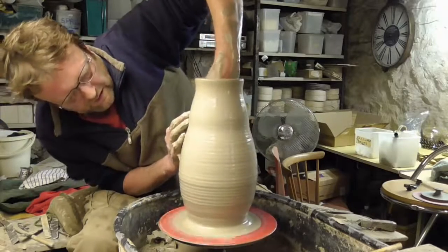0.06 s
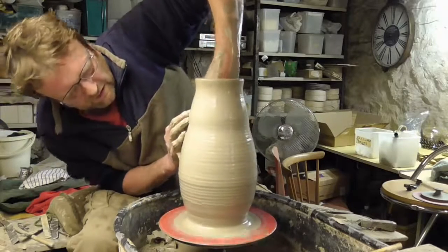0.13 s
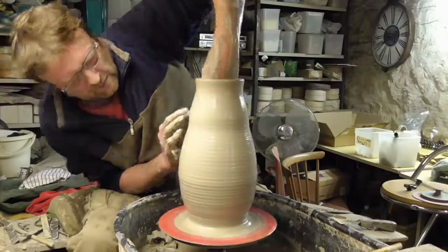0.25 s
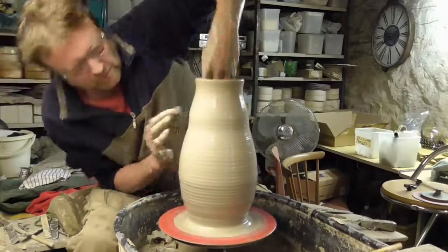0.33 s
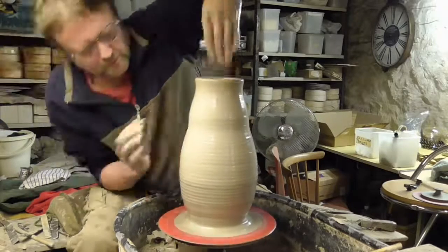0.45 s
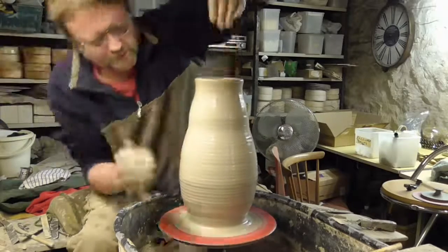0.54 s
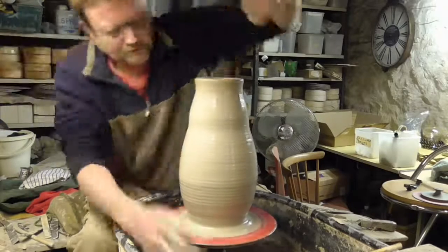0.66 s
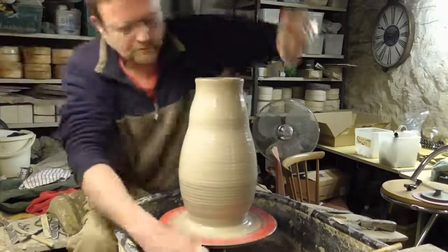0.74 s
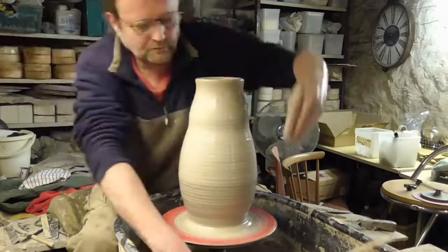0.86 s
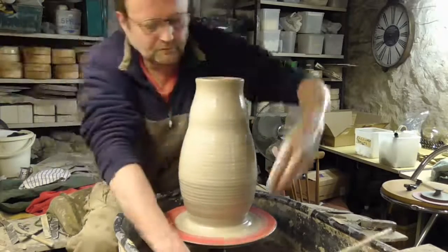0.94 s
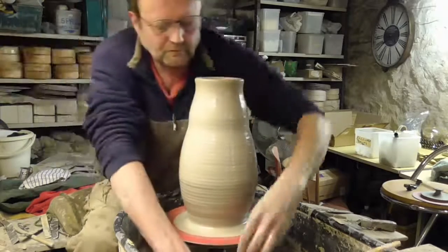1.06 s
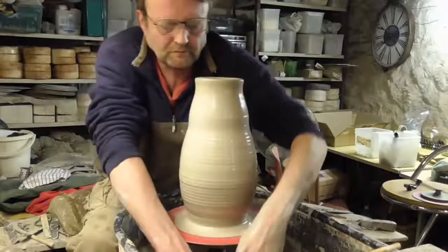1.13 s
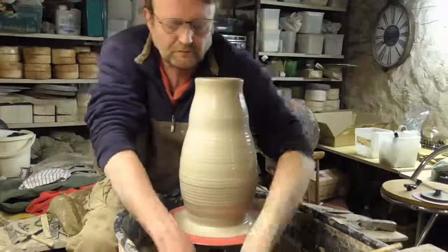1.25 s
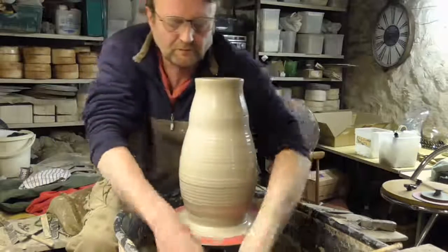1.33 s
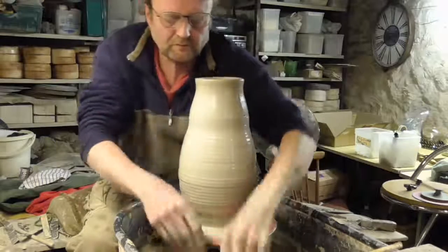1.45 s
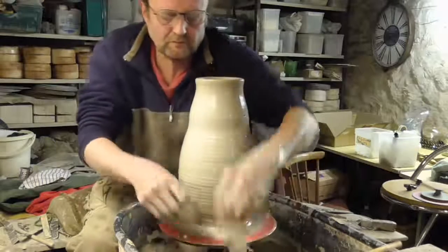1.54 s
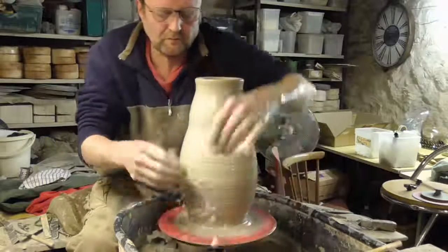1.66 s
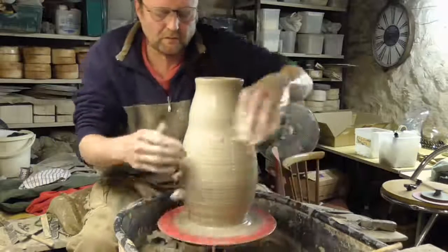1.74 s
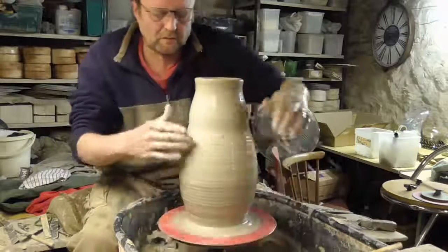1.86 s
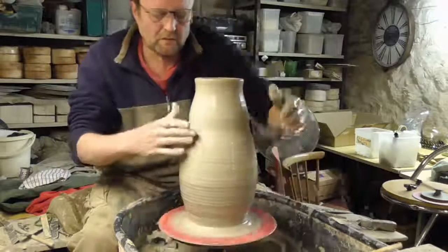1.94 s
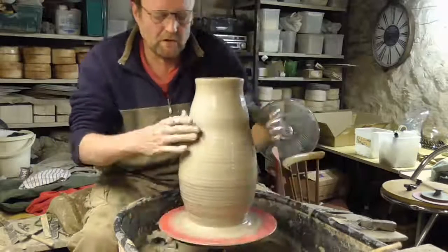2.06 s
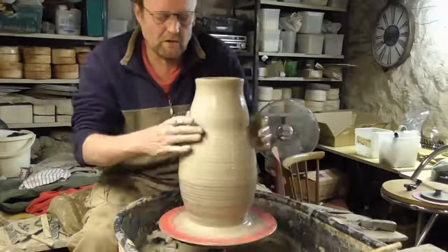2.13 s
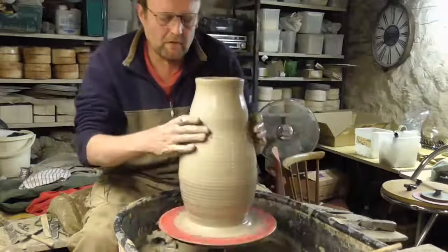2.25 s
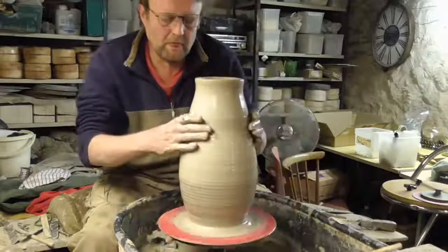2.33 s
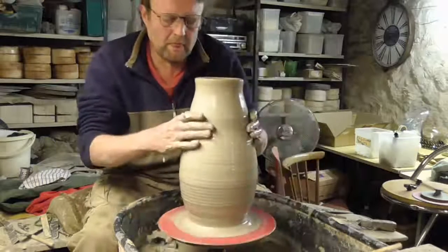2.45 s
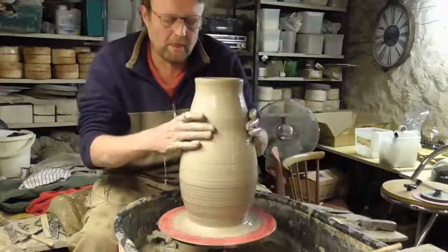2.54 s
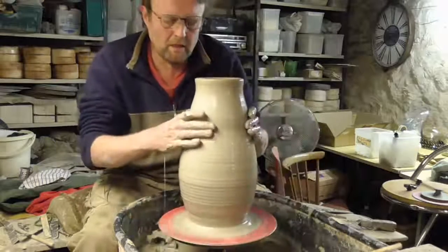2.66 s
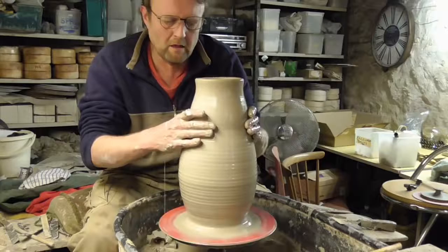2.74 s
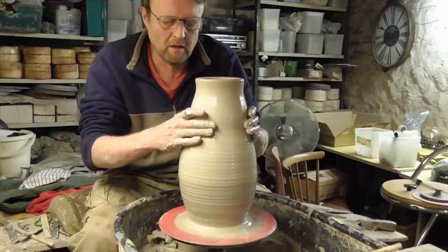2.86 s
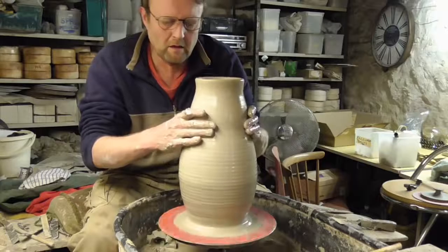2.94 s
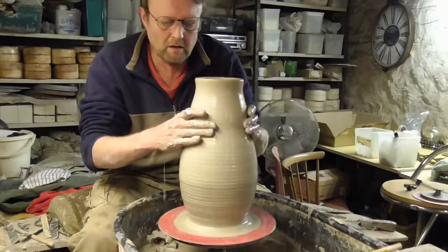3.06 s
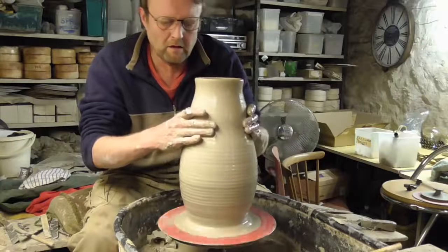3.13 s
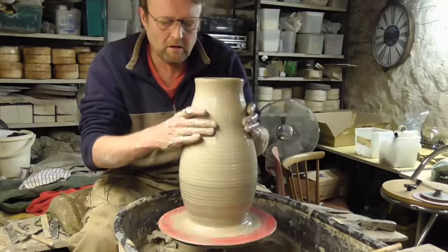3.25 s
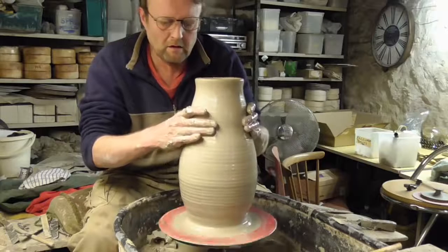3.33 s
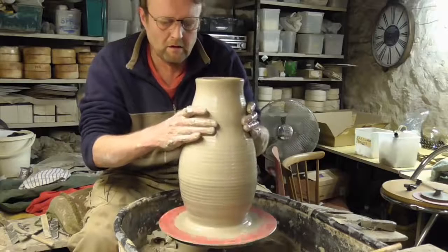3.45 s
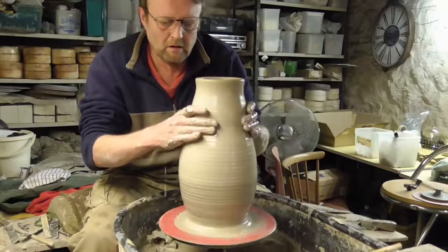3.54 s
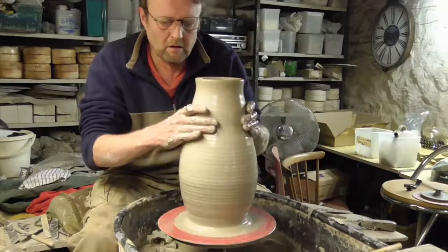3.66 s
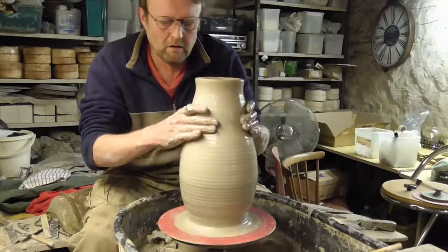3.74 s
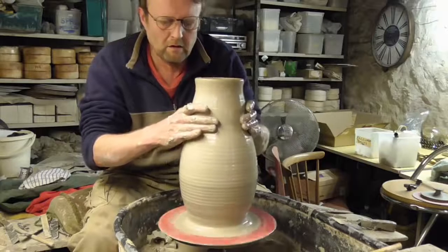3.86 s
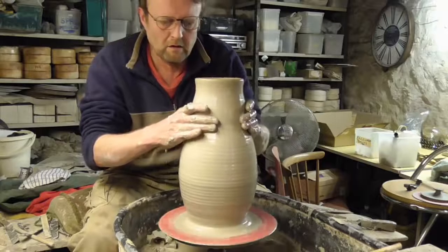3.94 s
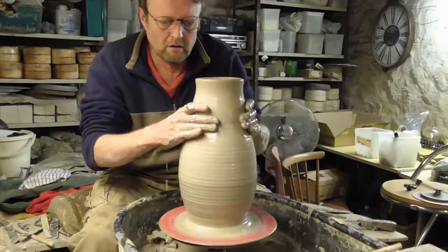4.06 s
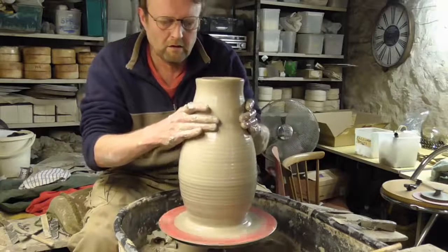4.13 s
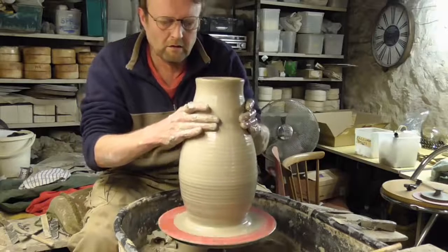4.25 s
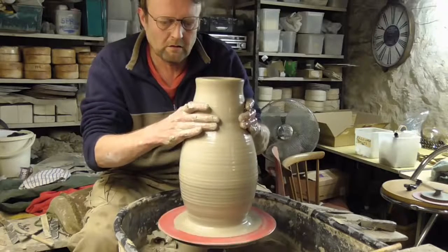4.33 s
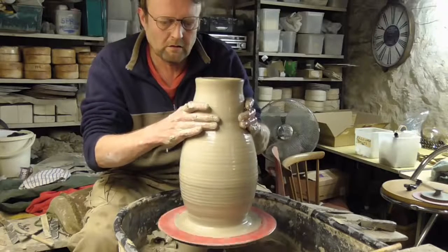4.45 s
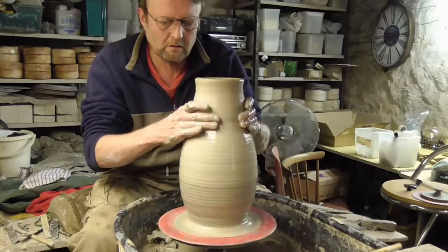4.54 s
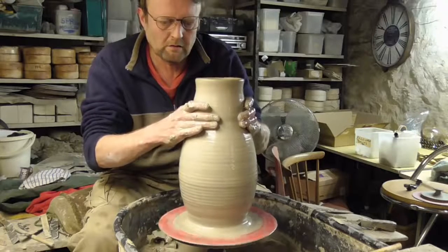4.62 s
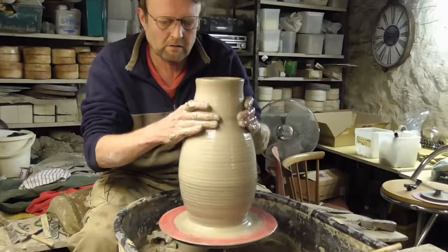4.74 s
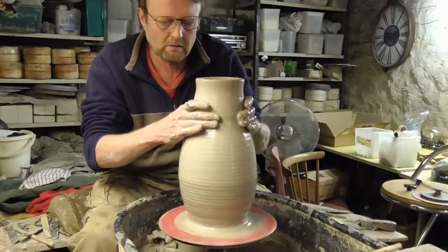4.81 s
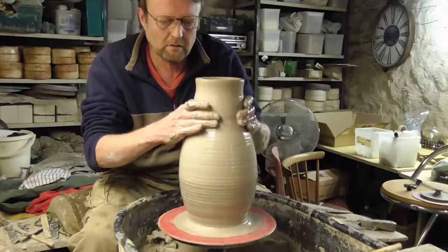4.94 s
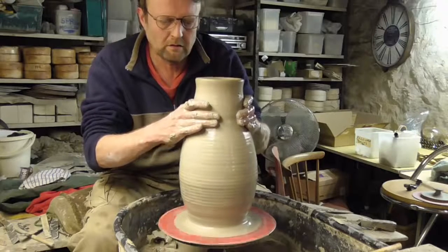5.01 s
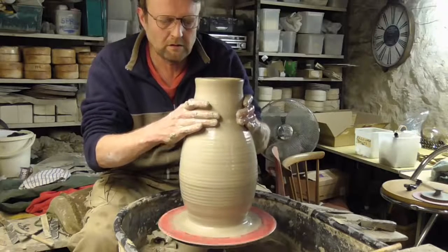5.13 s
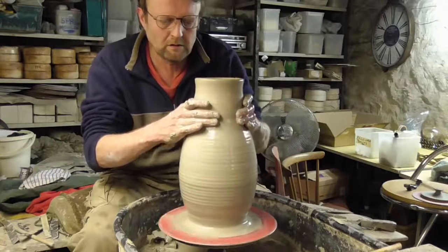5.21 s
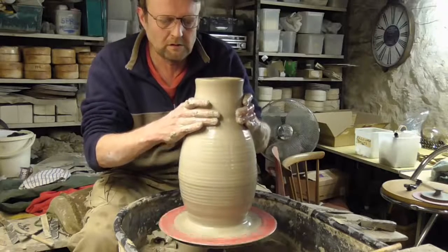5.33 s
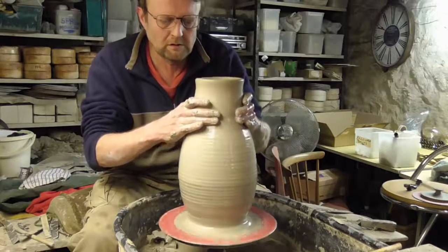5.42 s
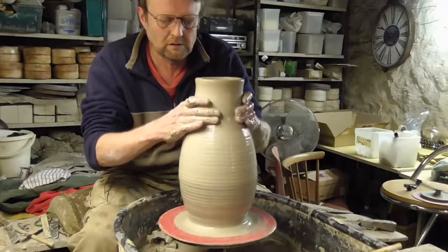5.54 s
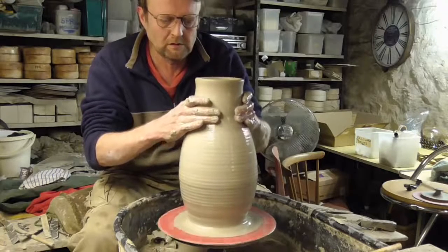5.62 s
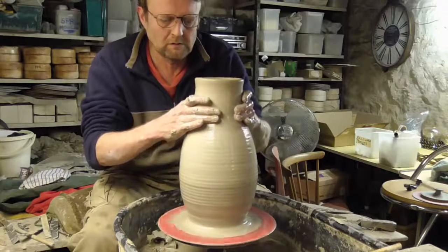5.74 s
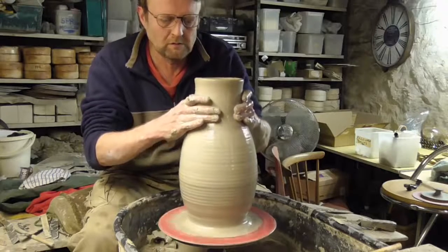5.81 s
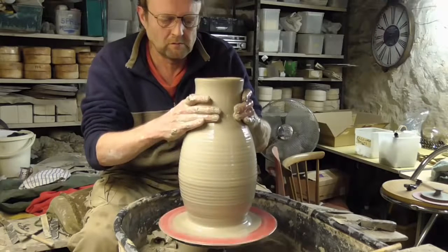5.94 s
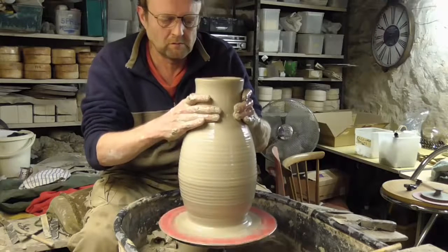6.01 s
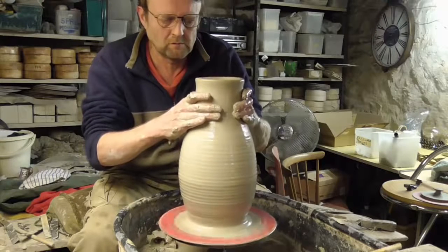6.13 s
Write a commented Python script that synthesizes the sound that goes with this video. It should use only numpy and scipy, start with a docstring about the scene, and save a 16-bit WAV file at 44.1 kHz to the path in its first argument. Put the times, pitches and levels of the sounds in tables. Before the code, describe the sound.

An electric potter's wheel hums and throbs while hands splash and drip in water, then slide faintly over wet spinning clay.

```python
"""In a small workshop an electric potter's wheel hums, throbbing with each turn of its drive,
while its frame rumbles and its bearing grumbles. The potter dips both hands in the splash pan:
palms slap, water sloshes, trapped air rings as bubbles and drops land with a ping.
Then wet palms hiss on the spinning clay and settle into a faint slither with tiny sticky ticks."""
import sys
import numpy as np
from scipy import signal
from scipy.fft import rfft, irfft, next_fast_len
from scipy.io import wavfile
from scipy.ndimage import uniform_filter1d, map_coordinates

SR = 44100
rng = np.random.default_rng(int(sys.argv[2]) if len(sys.argv) > 2 else 0)


def materialize(psi):
    """Save the field psi as 16-bit PCM at rate SR to the path in sys.argv[1].

    A 1-D psi becomes a single channel; in a 2-D psi each row is a channel.
    """
    bounded = np.clip(np.atleast_2d(psi).T, -1, 1)
    quanta = np.round(bounded * 32767).astype(np.int16)
    wavfile.write(sys.argv[1], SR, quanta)


N = 272538

MAINS_HZ, SHAFT_HZ = 50.015, 4.68  # the electric supply; turns a second of the drive shaft
# the bright tone of fine spray, shared by drops and sticky ticks: f/Hz, level/dB
SPRAY_SPECTRUM = [(1800, -17.5), (3200, -15), (4500, -17.5), (5700, -18.5), (7400, -10), (8600, -12.5),
                  (9700, -9), (12000, -8), (13500, -13), (15800, -30)]


def amp(db):
    """Turn decibels into a gain. A "t60" below is the time a sound takes to fade by 60 dB."""
    return 10 ** (np.asarray(db) / 20)


def unit(x):
    """Scale x to an average (rms) strength of 1."""
    return x / np.sqrt(np.mean(x ** 2) + 1e-20)


def clock():
    """The time of every sample in seconds."""
    return np.arange(N) / SR


def along(points, hz):
    """Read between (frequency, value) points, spaced by octaves."""
    f, v = np.transpose(points)
    return np.interp(np.log(hz + 1), np.log(f + 1), v)


def wobble(rate):
    """A smooth curve through `rate` random values a second."""
    return map_coordinates(rng.standard_normal(int(N * rate / SR) + 4), [clock() * rate])


def held(start, end, rise_s, fall_s):
    """Gain of a movement: it rises 60 dB in rise_s, holds from start to end, falls 60 dB in fall_s."""
    t = clock()
    return amp(-60 * (np.maximum(start - t, 0) / rise_s + np.maximum(t - end, 0) / fall_s))


def add(track, s, sound):
    """Mix a sound into a track at s seconds."""
    part = track[max(round(s * SR), 0):][:len(sound)]
    part += sound[:len(part)]


def filtered(x, response):
    """Turn each frequency in x up or down by the gain response(hz)."""
    size = next_fast_len(N + SR // 2)
    return irfft(rfft(x, size) * response(np.fft.rfftfreq(size, 1 / SR)), size)[..., :N]


def spread(pair, colour):
    """Blend two unrelated signals into stereo of strength 1, its tone shaped by colour(hz)."""
    # how alike left and right are: f/Hz, likeness (1 = the same)
    likeness = [(30, 0.18), (100, 0.3), (250, 1), (500, 0.8), (2000, 0.66), (4000, 0.78), (8000, 0.31),
                (12000, 0.3)]

    def shares(hz):
        angle = np.arccos(np.clip(along(likeness, hz), -1, 1)) / 2
        return colour(hz) * np.array([np.cos(angle), np.sin(angle)])
    mid, side = filtered(pair, shares)
    return unit(np.array([mid + side, mid - side]))


def rush(spectrum):
    """Stereo noise of strength 1 with the given spectrum."""
    return spread(rng.standard_normal((2, N)), lambda hz: amp(along(spectrum, hz)))


def narrow(hz, width_hz):
    """Stereo noise of strength 1, gathered around one pitch."""
    return spread(rng.standard_normal((2, N)), lambda f: 1 / (1 + ((f - hz) / width_hz) ** 2))


def froth(spectrum, rate, low_hz, high_hz, cycles, scatter_db, wash_db):
    """Tiny ringing bubbles, `rate` a second, on a wash of noise; stereo, strength 1."""
    when, pitch, strength = rng.random((int(rate * N / SR), 3)).T[:, :, None]
    age = np.arange(500)  # samples
    turns = low_hz * (high_hz / low_hz) ** pitch * age / SR
    gain = amp(-scatter_db * np.log(strength + 0.079))
    rings = gain * np.sin(2 * np.pi * turns) * np.exp(-turns / cycles) * (1 - age / len(age))
    places = (when * N).astype(int) + age
    cloud = np.bincount(places.ravel(), rings.ravel(), N)[:N]
    cloud = unit(cloud) + amp(wash_db + 5.3 * wobble(180)) * rng.standard_normal(N)
    # left and right get the same bursts with different fine detail
    bursts = np.sqrt(np.abs(uniform_filter1d(cloud ** 2, size=200)))
    pair = np.array([cloud, bursts * rng.standard_normal(N)])
    return spread(pair, lambda hz: amp(along(spectrum, hz)))


def workshop_echo(x, width=0.47):
    """Crowded shelves scatter a sound into a short echo, much alike left and right."""
    # how long the room rings: f/Hz, t60/s
    ring_times = [(200, 0.086), (2000, 0.24), (12000, 0.057)]
    hz, t, noise = signal.stft(rng.standard_normal((2, SR // 2)), SR, nperseg=256)
    fade = amp(-60 * t / along(ring_times, hz)[:, None])
    mid, side = signal.istft(noise * fade, SR, nperseg=256)[1]
    tail = np.array([mid + width * side, mid - width * side]) / np.linalg.norm(mid)
    delayed = np.pad(x, (130, 0))
    return signal.fftconvolve(delayed[None], tail, axes=1)[:, :N]


def bearing(swell_db=0.5, swell_s=0.11, scuff_t60=0.18):
    """The bearing grinds harder twice a turn and rings the housing; the drive scuffs, whines, hisses."""
    # pitches at which the housing rings: f/Hz, width/Hz, level/dB
    resonances = [(428, 44, 1), (493.6, 19.7, 3.5), (521, 12, 4), (615.8, 15, 4), (679, 37, -4),
                  (818, 57, -5.5), (932, 37, -9.5), (1050, 26, -10.5), (1187, 55, -8), (1350, 21, -10.5),
                  (1448, 30, -14.5), (2125, 26, -20.5)]
    # scuffs of the drive: t/s, scrape level/dB, housing bump level/dB
    scuff_events = [(.283, -42.5, -48), (.612, -44, -58), (2.0, -46, -49), (2.226, -40.5, -33.5),
                    (2.645, -48, -39), (3.108, -43, -52), (3.276, -44.5, -52), (3.41, -45.5, -54),
                    (3.717, -48, -52), (4.085, -43.5, -49), (4.598, -37, -38), (5.045, -45, -45),
                    (5.357, -46.5, -50), (5.506, -42, -42)]
    # steady hiss of the running machine: f/Hz, level/dB
    hiss_spectrum = [(300, 7), (1500, -43), (2500, -2), (3300, 3.5), (4400, 4.5), (5800, -1.5),
                     (7600, -1.5), (8800, -3), (11500, -1.5), (13500, -5), (15800, -27)]

    def housing(f):
        power = sum(amp(db) ** 2 / (1 + ((f * f - hz * hz) / (width * f + 1)) ** 2)
                    for hz, width, db in resonances)
        return np.sqrt(power / (1 + (f / 2600) ** 6))  # duller above 2600 Hz
    swell = swell_db * np.cos(4 * np.pi * SHAFT_HZ * (clock() - swell_s))
    grind = amp(-47 + swell + 0.87 * wobble(25.19)) * spread(rng.standard_normal((2, N)), housing)
    scrape, bump, t = np.zeros(N), np.zeros(N), np.arange(SR // 4) / SR
    touch = amp(-60 * t / scuff_t60) * (1 - np.exp(-t / 0.0093))
    for s, scrape_db, bump_db in scuff_events:
        add(scrape, s, amp(scrape_db) * touch)
        add(bump, s, amp(bump_db) * touch)
    whine = amp(-75 + 1.3 * wobble(13)) * narrow(hz=3050, width_hz=46)
    scuffs = scrape * narrow(hz=1267, width_hz=200) + bump * narrow(hz=600, width_hz=110)
    return grind + scuffs + whine + amp(-64.5) * rush(hiss_spectrum)


def shudder(rate_hz, peak_s, depth_db):
    """A swell in dB that comes round with every turn."""
    return depth_db * np.cos(2 * np.pi * rate_hz * (clock() - peak_s))


def frame_rumble(level_db=-34, turn_s=0.6385, repeat_share=0.62):
    """The frame shudders with the drive; most of its rumble repeats with each turn of the wheel."""
    # tone of the rumble: f/Hz, level/dB
    spectrum = [(25, -21.5), (58, -23), (82, 3), (105, -2.5), (122, -4.5), (138, 4.5), (158, -2),
                (183, 9.5), (205, 4), (265, -5.5), (304, 9.5), (335, -6), (385, -10), (600, -51.5)]
    # its slow rise and fall: t/s, level change/dB
    slow_swell = [(0, -.5), (1.5, 0), (2.5, 0.7), (3.2, 0.5), (3.9, -0.7), (4.5, -1.2), (5.15, 1.5),
                  (5.7, -0.5)]
    shaft_db = shudder(SHAFT_HZ, peak_s=0.054, depth_db=1.0)
    slow_part_db = shudder(rate_hz=2.97, peak_s=0.32, depth_db=0.71)  # a slower part of the drive
    drift_db = np.interp(clock(), *np.transpose(slow_swell)) + wobble(18)
    one_turn = irfft(np.exp(2j * np.pi * rng.random((2, round(turn_s * SR / 2)))))  # plain noise
    looped = one_turn[:, np.arange(N) % one_turn.shape[1]]
    repeating = spread(looped, lambda hz: amp(along(spectrum, hz)))
    rumble = np.sqrt(repeat_share) * repeating + np.sqrt(1 - repeat_share) * rush(spectrum)
    return amp(level_db + shaft_db + slow_part_db + drift_db) * rumble


def motor_hum(sway_rad=0.25, wander_rad=0.57):
    """The motor's magnetic hum sags and sways once a turn, where the drive binds."""
    # tones of the hum: multiple of the mains, level/dB, t/s of a deepest sag
    hum_tones = [(2, -28, 0.171), (4, -32.5, 0.1554), (6, -46, .11)]
    # side tones that make them throb: multiple of the mains, offset in shaft rates, level/dB
    side_tones = [(2, -1, -47), (2, 2, -48.5), (2, 3, -52), (4, -1, -40), (4, -2, -48), (4, -4, -47),
                  (4, -5, -52), (6, -1, -51), (6, -2, -52), (6, 2, -53), (6, 3, -53)]
    mains_phase = 2 * np.pi * MAINS_HZ * clock()
    hum = np.zeros(N)
    for multiple, db, bind_s in hum_tones:
        phase = multiple * mains_phase
        shaft = 2 * np.pi * SHAFT_HZ * (clock() - bind_s)
        throb = sum(amp(side_db) * np.sin(phase + offset * shaft + wander_rad * wobble(3.026))
                    for parent, offset, side_db in side_tones if parent == multiple)
        tone = amp(db + 0.27 * multiple * wobble(4)) * np.sin(phase + sway_rad * np.cos(shaft))
        hum += throb - tone
    return np.sqrt(2) * hum


def sticking_fingers(from_s=2.3, per_second=9, faint_db=-57, scatter_db=3.5, tick_t60=0.014):
    """Wet fingers catch on the turning clay and let go with tiny dry ticks."""
    # the few clearer ticks: t/s, level/dB
    clear_ticks = [(2.997, -52), (3.212, -50), (3.392, -46), (5.097, -46.5), (5.153, -42.5)]
    out, t = np.zeros(N), np.arange(SR // 30) / SR
    span = N / SR - from_s
    faint_ticks = [(from_s + span * when, faint_db + scatter_db * (2 * size - 1))
                   for when, size in rng.random((int(per_second * span), 2))]
    for s, db in clear_ticks + faint_ticks:
        add(out, s, amp(db - 60 * t / tick_t60))
    return out * rush(SPRAY_SPECTRUM)


def palms_on_clay(slither_db=-82, grit_db=-7, rise_s=0.32):
    """Wet skin hisses and crackles on the pot until the film of runny clay evens out; fingers squeak."""
    # strokes of skin on clay: start/s, end/s, level/dB, t60/s
    strokes = [(0.558, 0.628, -54.5, 0.2), (0.82, 0.845, -57.5, 0.1), (2.07, 2.31, -51.5, 2)]
    # thin fingertip squeaks: t/s, level/dB, f/Hz, half length/s, width/Hz
    squeak_events = [(2.55, -63, 11400, 0.31, 700), (4.103, -61, 11400, .03, 1600),
                     (4.665, -60, 7600, .025, 700)]
    # tone of sliding on wet clay: f/Hz, level/dB
    spectrum = [(1200, 6), (2500, -4), (3500, -7), (4650, -2.5), (5400, -5), (5750, 0), (6300, -3.5),
                (7500, 2.5), (8400, -3.5), (9400, 1), (9750, -3), (10300, 2), (11600, 1.5), (12800, -2),
                (15500, -17)]
    slide = amp(slither_db) + sum(amp(db) * held(start, end, rise_s, fall_s)
                                  for start, end, db, fall_s in strokes)
    squeaks = sum(amp(db) * np.exp(-((clock() - s) / half) ** 2) * narrow(hz, width)
                  for s, db, hz, half, width in squeak_events)
    grit = froth(spectrum, rate=500, low_hz=3980, high_hz=12700, cycles=12, scatter_db=3.5, wash_db=-8)
    flicker = amp(0.88 * wobble(60))
    hiss = unit(rush(spectrum) + amp(grit_db) * grit)
    return slide * flicker * hiss + squeaks


def sloshing(rise_s=0.91, fall_s=0.99):
    """Hands stir the pan and throw up splashes: larger bubbles gurgle, fine spray fizzes."""
    # hands moving through the water: start/s, end/s, level/dB
    stirs = [(1.04, 1.4, -50.5), (1.47, 1.62, -49.5), (1.97, 2.02, -52.5)]
    # water running off the hands: start/s, end/s, level/dB
    runoff = [(1.04, 1.36, -58), (1.47, 1.77, -49.5)]
    # splashes as the hands plunge and lift: t/s, slosh level/dB, spray level/dB, t60/s
    splashes = [(0.9, -48.5, -60, 0.55), (0.976, -36, -39, 0.13), (1.093, -47, -39, 0.12),
                (1.25, -51.5, -39, 0.15), (1.294, -47, -42, 0.12), (1.372, -51, -53, 0.18),
                (1.397, -54.5, -29.5, 0.098), (1.455, -48, -58.5, 0.15), (1.519, -50, -52, 0.067),
                (1.698, -70, -54, 0.18), (1.831, -76, -40.5, 0.13), (1.905, -54, -60, 0.49),
                (1.958, -50, -46.5, 0.1)]
    # tone of the gurgling water: f/Hz, level/dB
    slosh_spectrum = [(250, -19), (500, 1), (800, 3), (1250, 4.5), (2400, -8.5), (3600, -3.5), (5000, -5),
                      (7000, -41)]

    def flow(moves):
        return np.max([amp(db) * held(start, end, rise_s, fall_s) for start, end, db in moves], axis=0)
    slosh, spray, t = flow(stirs), flow(runoff), np.arange(SR // 4) / SR
    for s, slosh_db, spray_db, t60 in splashes:
        surge = (1 - np.exp(-t / 0.0062)) * amp(-60 * t / t60)
        add(slosh, s, amp(slosh_db) * surge)
        add(spray, s, amp(spray_db) * surge)
    gurgle = froth(slosh_spectrum, rate=600, low_hz=602, high_hz=5420,
                   cycles=20, scatter_db=1.5, wash_db=-1.5)
    fizz = froth(SPRAY_SPECTRUM, rate=1400, low_hz=4020, high_hz=14550,
                 cycles=27, scatter_db=3.5, wash_db=-4.5)
    return slosh * gurgle + spray * fizz


def slaps(slap_t60=0.032):
    """A flat hand meets the wet: a burst around one pitch, broad for a slap, narrow for a squelch."""
    # palms hitting water and clay: t/s, level/dB, f/Hz, width/octaves
    hits = [(.725, -51.5, 3500, 1.4), (.952, -34, 483, 0.65), (0.961, -39, 1200, 1),
            (.978, -38.5, 494, 0.53), (.983, -37, 2010, 0.49), (.983, -37, 3480, .7),
            (1.27, -37.5, 3430, 1.2), (1.306, -38, 1010, 1.2), (1.374, -28.5, 760, 1.3),
            (1.398, -35, 750, 0.93), (1.391, -41, 3500, 0.64), (1.408, -42, 3080, .5),
            (1.455, -40, 4050, .3), (1.477, -38.5, 3530, 0.58), (1.521, -34, 1450, 1.3),
            (1.735, -42, 3560, 0.61), (1.904, -45, 2900, 0.54), (1.915, -37.5, 2920, .8),
            (1.96, -34.5, 3820, .9), (2.196, -42.5, 4410, 0.25)]
    out, t = np.zeros(N), np.arange(SR // 8) / SR
    for s, db, hz, octaves in hits:
        edges_hz = hz * 2 ** (octaves * np.array([-0.5, 0.5]))
        band = signal.butter(2, edges_hz, "band", fs=SR, output="sos")
        splatter = unit(signal.sosfilt(band, rng.standard_normal(len(t))))
        # the air caught under the palm gives one short push
        push = np.sin(2 * np.pi * hz * t) * np.exp(-hz * octaves * t / 2)
        add(out, s, amp(db) * (amp(-60 * t / slap_t60) * splatter + 1.3 * push))
    return out


def drops(ping_t60=0.0062, smack_t60=0.017):
    """A drop lands with a wet smack and the rising ping of a tiny bubble."""
    # drops landing: t/s, level/dB, f/Hz
    landings = [(.517, -41, 11100), (.636, -38, 8800), (0.884, -35, 11500), (0.9302, -27.5, 6970),
                (0.9628, -29, 10800), (0.9843, -25, 10940), (1.042, -35, 8370), (1.105, -28, 6850),
                (1.127, -33, 11600), (1.237, -29, 4940), (1.253, -28, 8400), (1.2714, -34, 3130),
                (1.302, -24.5, 8100), (1.4005, -18.5, 7500), (1.416, -23, 11070), (1.486, -28, 6800),
                (1.576, -26.5, 10900), (1.631, -19, 8060), (1.6641, -13, 9760), (1.699, -27, 12700),
                (1.715, -20.5, 11600), (1.832, -31, 11420), (1.853, -34, 8300), (1.869, -40, 7200),
                (1.925, -24, 7570), (1.9606, -22, 7240), (2.197, -17.5, 11400)]
    pings, smacks, t = np.zeros(N), np.zeros(N), np.arange(SR // 10) / SR
    onset = 1 - np.exp(-t / 0.00025)
    for s, db, hz in landings:
        strike = amp(db - 0.5) * onset
        add(pings, s, strike * amp(-60 * t / ping_t60) * np.sin(2 * np.pi * hz * t * (1 + 5 * t)))
        add(smacks, s, strike * amp(-60 * t / smack_t60) * rng.standard_normal(len(t)))
    return pings + filtered(smacks, lambda hz: amp(along(SPRAY_SPECTRUM, hz)))


def bubbles():
    """Each air pocket rings and rises in pitch as it nears the surface."""
    # air trapped under the hands: t/s, level/dB, f/Hz, t60/s, pitch rise over t60 (0.1 = a tenth)
    pockets = [(0.961, -23, 1050, 0.041, .03), (0.975, -18.5, 793, 0.083, .02),
               (0.993, -20, 795, 0.077, .02), (.99, -35, 3100, .04, .05), (.998, -31, 3720, .025, .03),
               (1.019, -33, 804, 0.1, .02), (1.014, -35, 4170, .03, .03), (1.024, -39, 2700, 0.03, .12),
               (1.079, -38, 2030, 0.047, .04), (1.161, -35, 4090, 0.023, .03),
               (1.199, -40.5, 2290, 0.044, .1), (1.3, -33.5, 1134, 0.064, .1),
               (1.374, -30, 685, 0.019, .03), (1.375, -28, 1310, 0.046, .1), (1.392, -32, 3070, 0.024, .05),
               (1.407, -35, 2820, .022, .05), (1.415, -31.5, 1237, 0.064, .35),
               (1.458, -32, 966, 0.034, .08), (1.47, -40, 1460, .05, .15), (1.477, -32, 3220, 0.032, .05),
               (1.521, -31, 2010, 0.033, .03), (1.524, -27.5, 1050, 0.048, 0.089),
               (1.538, -33, 776, 0.11, .05), (1.546, -38, 4440, 0.028, 0.034),
               (1.565, -34, 1750, 0.036, .35), (1.596, -38, 3500, 0.03, .08),
               (1.735, -35.5, 3500, 0.029, 0.054), (1.917, -30, 3520, 0.027, 0.12),
               (2.196, -46, 4250, 0.026, .05)]
    out, t = np.zeros(N), np.arange(SR // 5) / SR
    onset = 1 - np.exp(-t / 0.0032)
    for s, db, hz, t60, rise in pockets:
        turns = hz * (t + rise * t * t / (2 * t60))
        add(out, s, amp(db - 60 * t / t60) * onset * np.sin(2 * np.pi * turns))
    return out


def scene():
    """Wheel, water and hands, a little to the right of centre."""
    # stereo balance: f/Hz, left minus right level/dB
    balance = [(125, .1), (250, -.8), (500, -2.3), (1000, -.9), (3000, 0), (8000, -1.6), (12000, -2.3)]
    splashes = bubbles() + drops() + slaps()
    wheel = motor_hum() + frame_rumble() + bearing()
    mix = wheel + sloshing() + palms_on_clay() + sticking_fingers() + splashes
    mix += amp(-6) * workshop_echo(splashes)
    return filtered(mix, lambda hz: amp(np.outer([1, -1], along(balance, hz)) / 2))


def record(dry, fade_s=0.004, top_hz=15800):
    """Fade both ends quickly and cut the very highest treble."""
    fade = np.clip(np.minimum(clock(), clock()[::-1]) / fade_s, 0, 1)
    return filtered(dry * fade, lambda hz: hz < top_hz)


dry = scene()
out = record(dry)
materialize(out)
```